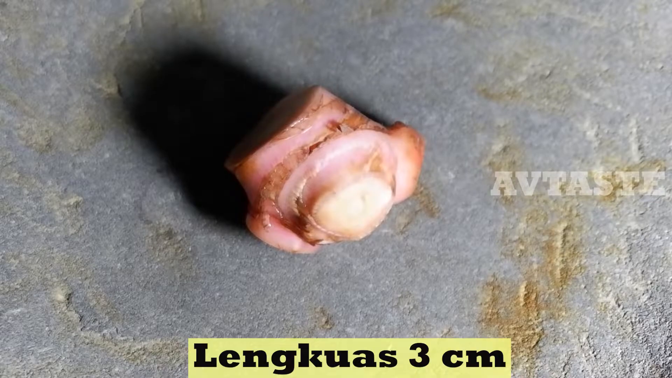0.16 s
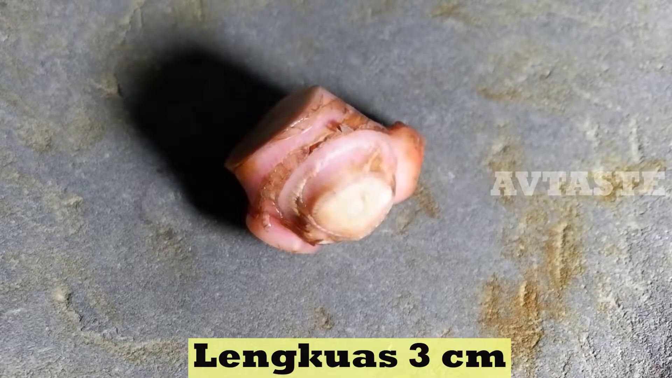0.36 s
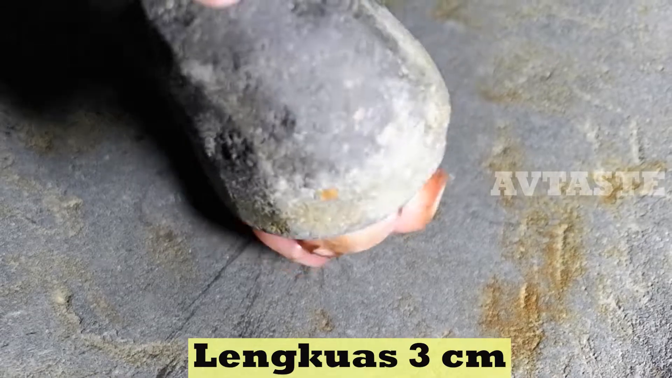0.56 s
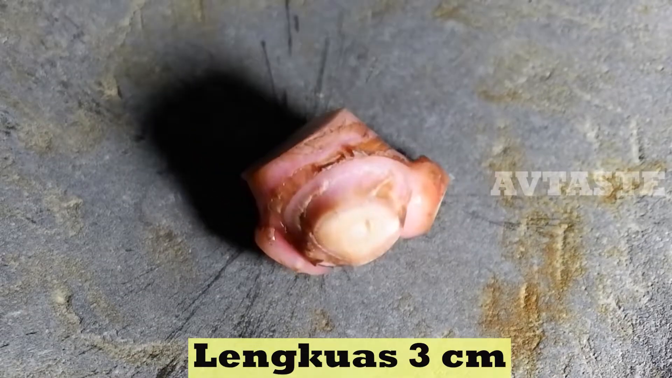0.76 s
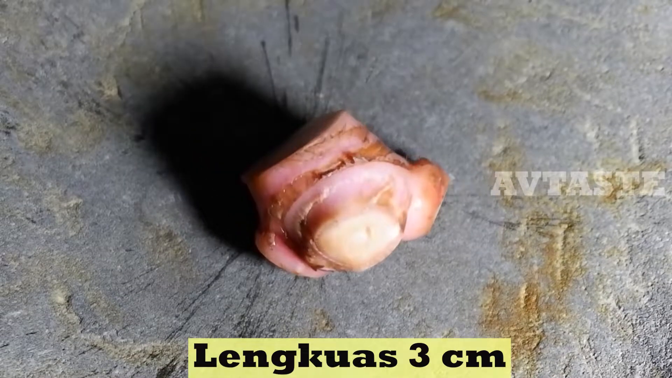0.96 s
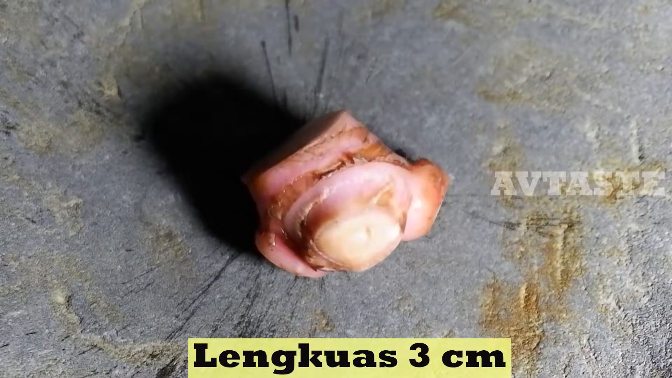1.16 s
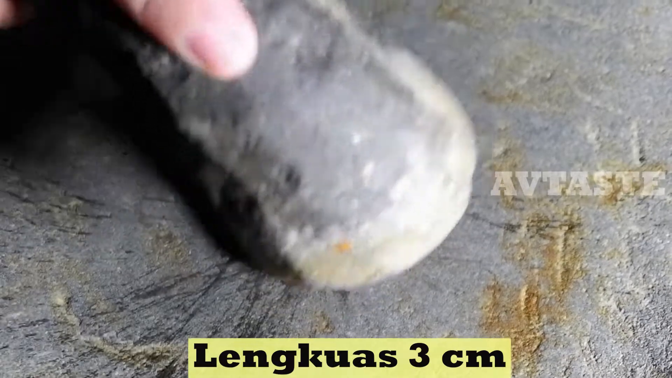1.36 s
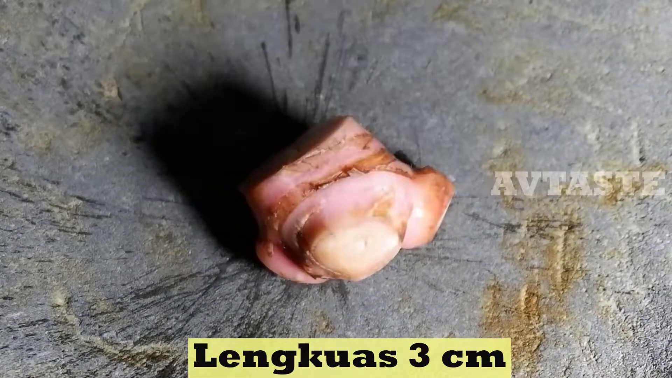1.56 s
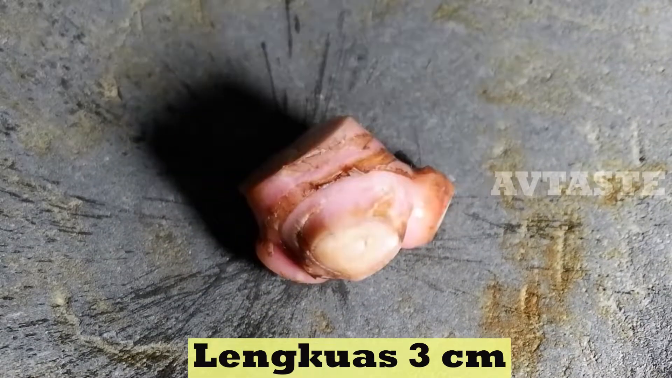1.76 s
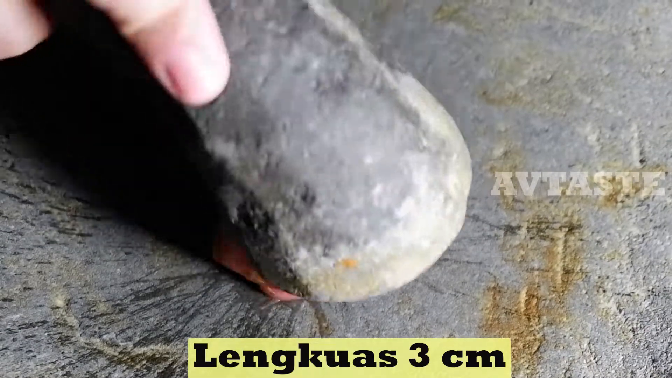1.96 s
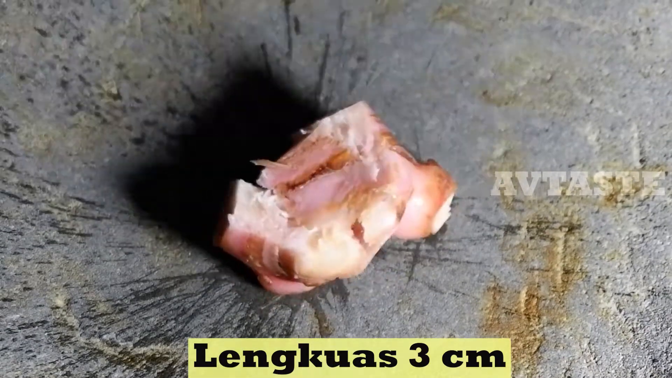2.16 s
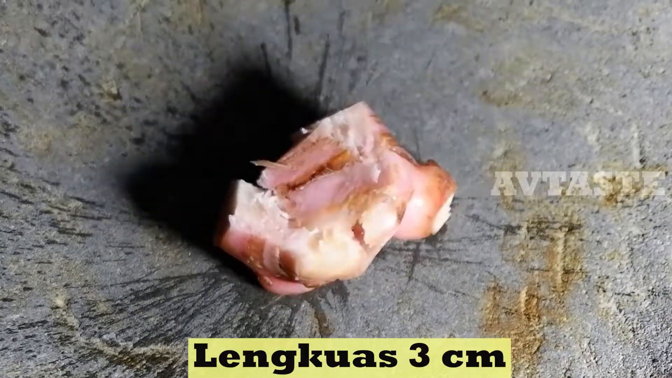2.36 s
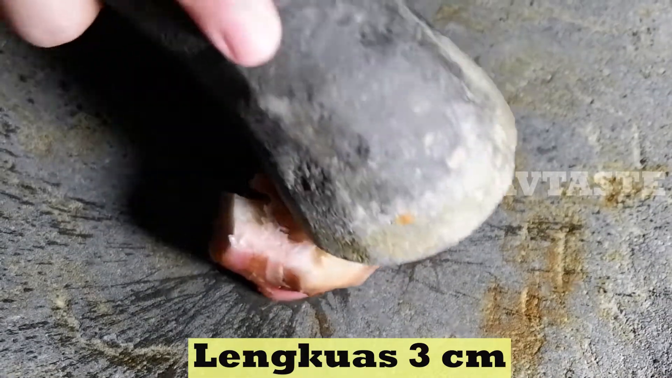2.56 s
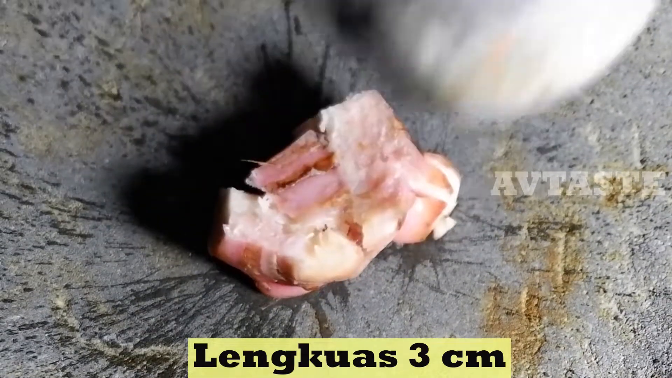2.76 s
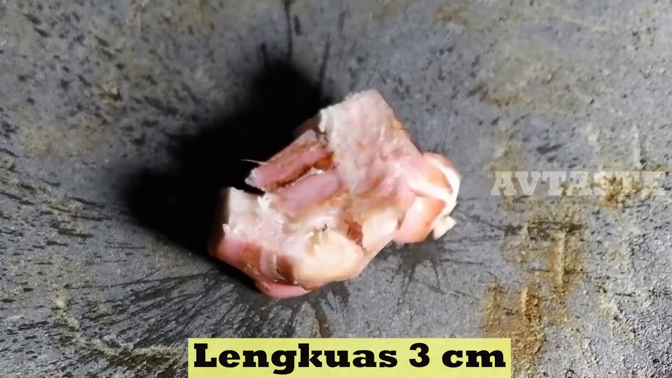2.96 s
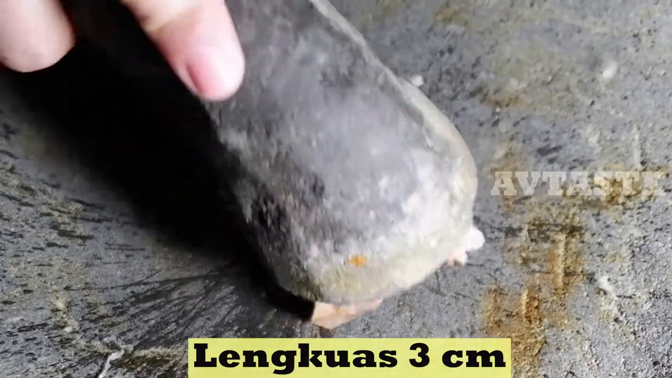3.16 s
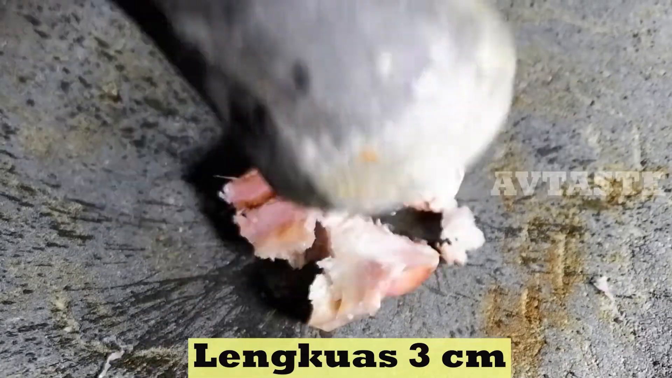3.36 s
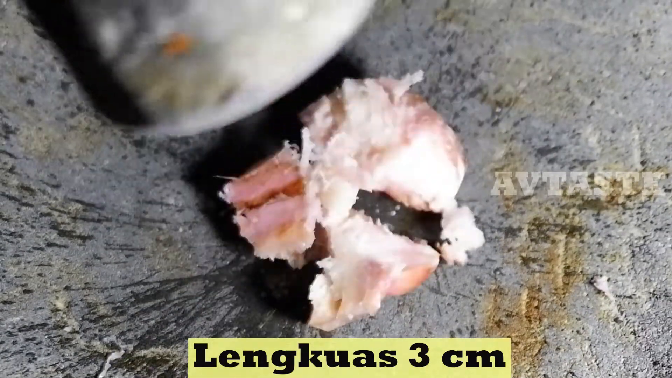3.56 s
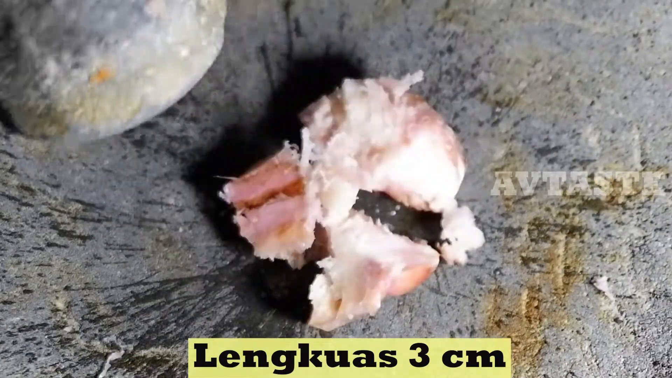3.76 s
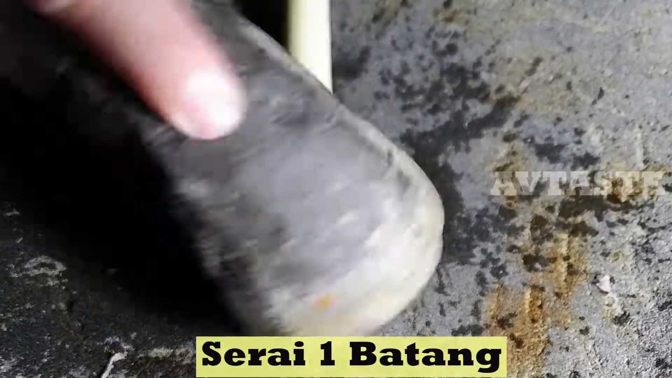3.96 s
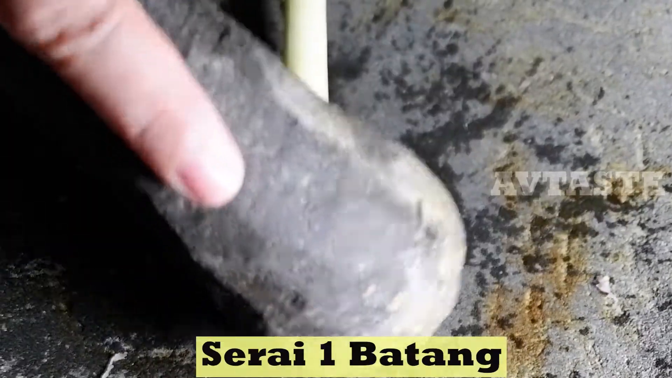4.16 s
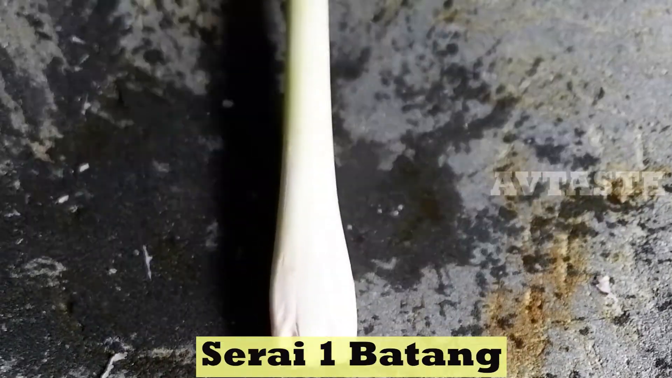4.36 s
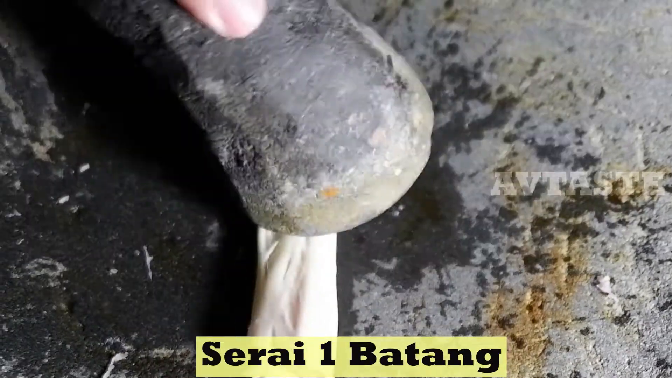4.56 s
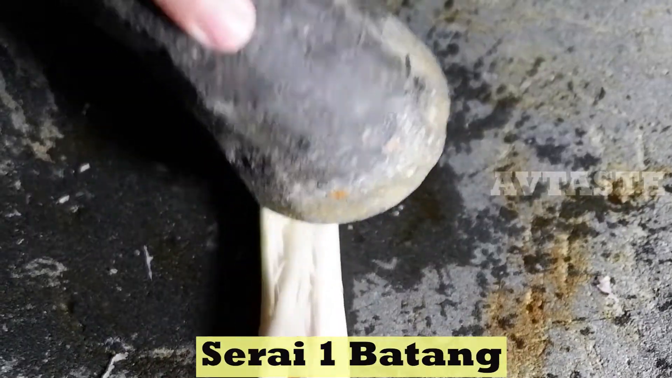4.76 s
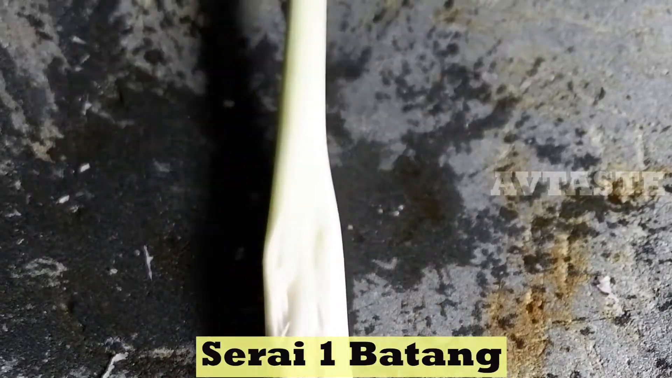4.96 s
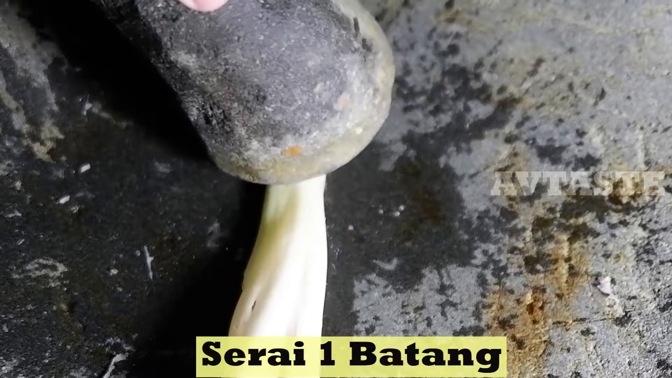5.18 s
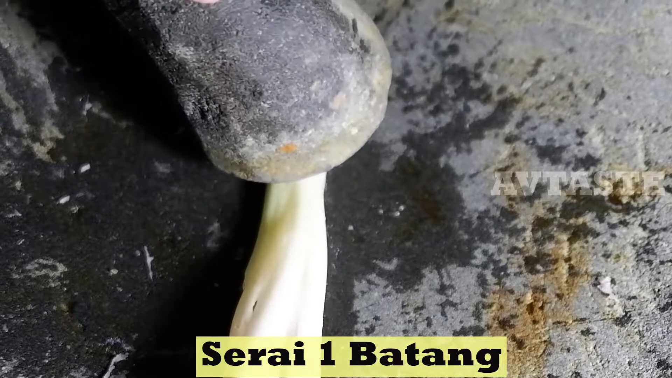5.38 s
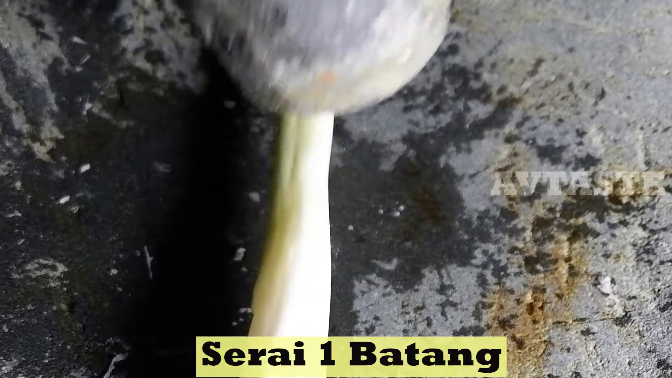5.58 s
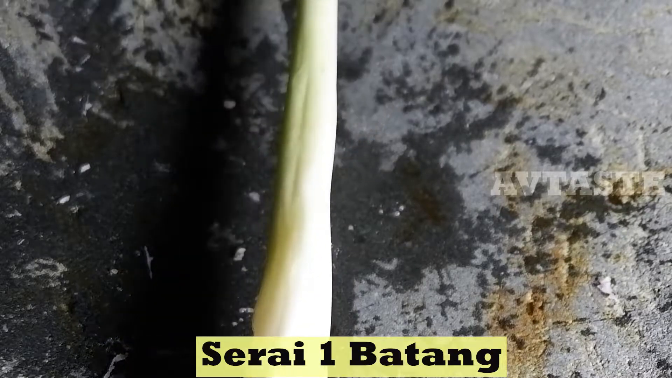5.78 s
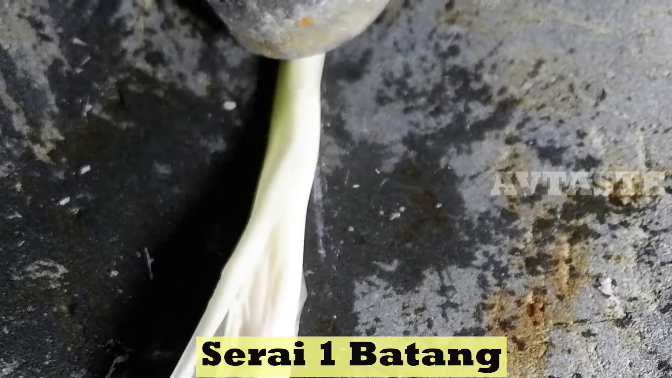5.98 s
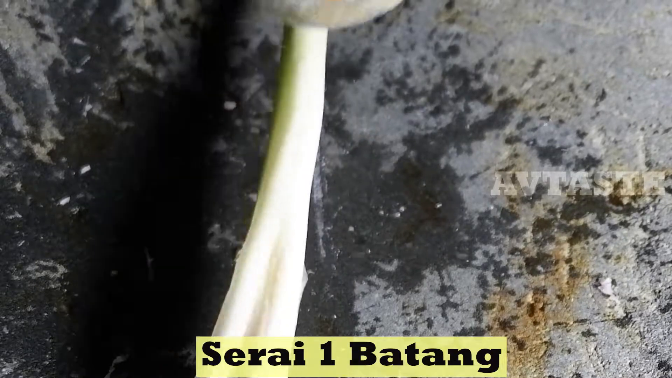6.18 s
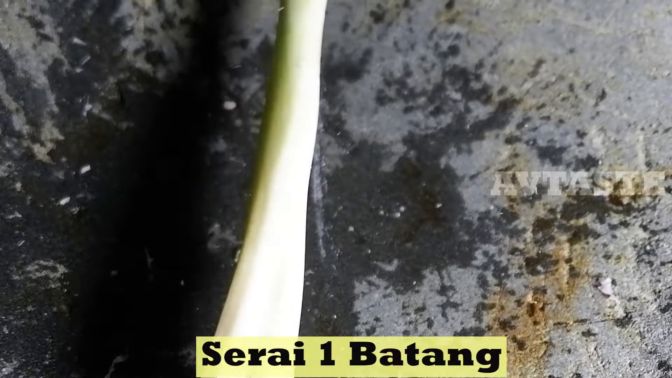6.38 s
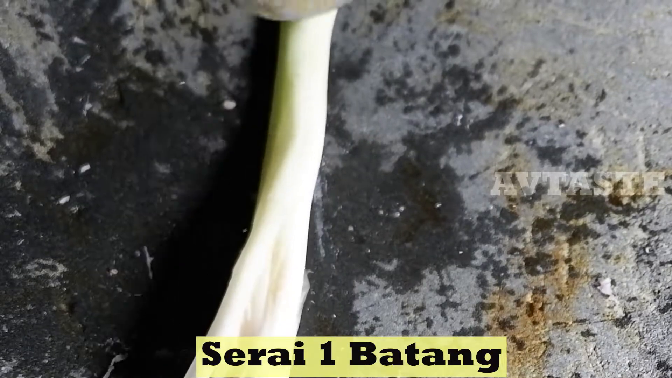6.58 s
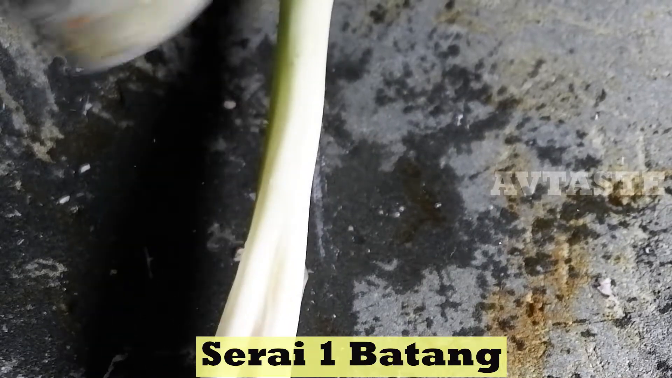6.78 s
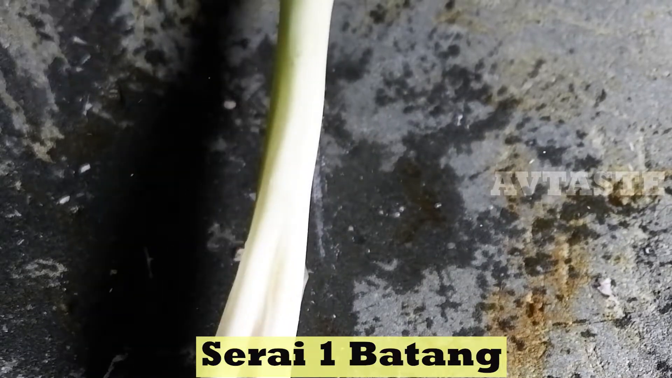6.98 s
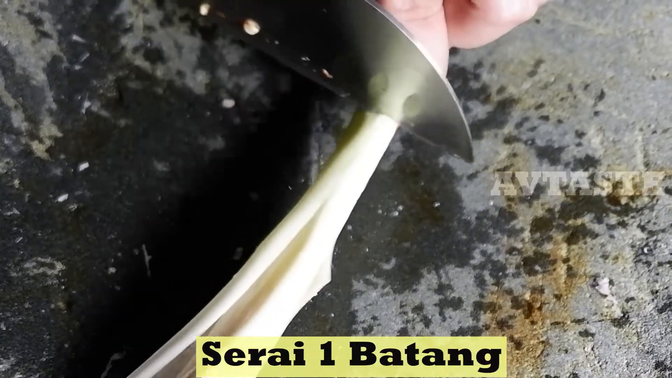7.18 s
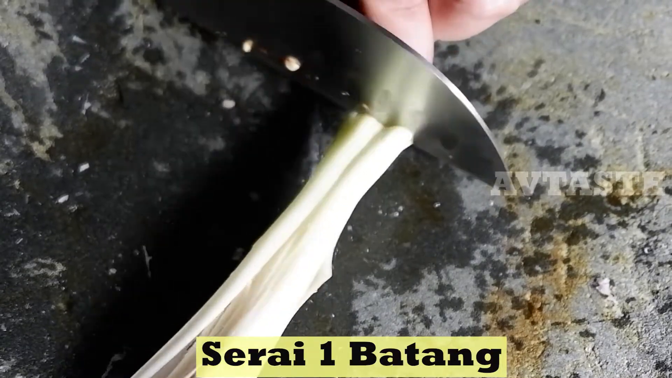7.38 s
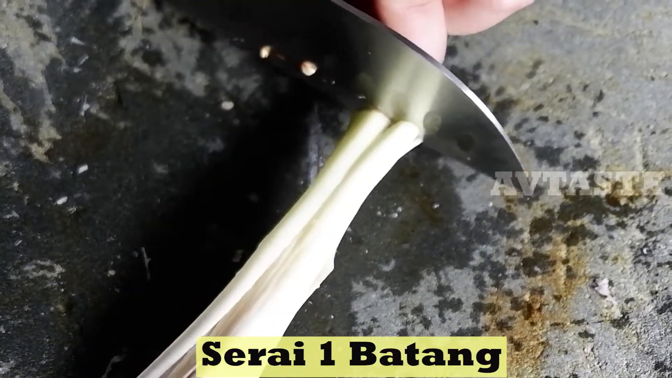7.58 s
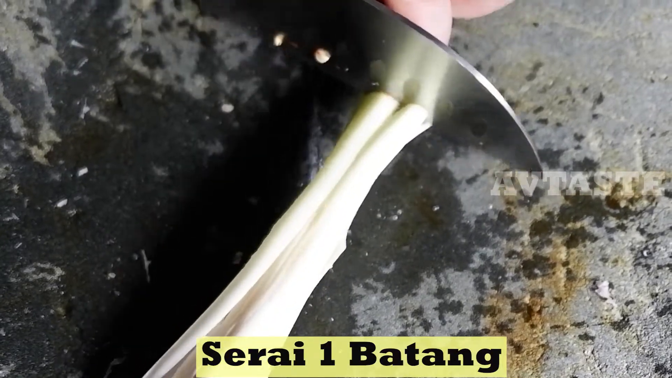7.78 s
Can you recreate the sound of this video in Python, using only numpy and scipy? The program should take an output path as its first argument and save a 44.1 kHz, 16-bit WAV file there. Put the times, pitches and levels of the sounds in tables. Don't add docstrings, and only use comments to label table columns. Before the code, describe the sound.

Ten spaced, crunching thuds of stone on slab ring through a hard kitchen, then cut abruptly to the dry, fibrous tearing of a blade.

```python
import sys
import numpy as np
from scipy import signal
from scipy.io import wavfile

SR = 44100
rng = np.random.default_rng(int(sys.argv[2]) if len(sys.argv) > 2 else 0)


def wav_record(signal):
    frames = np.transpose(np.atleast_2d(signal))
    bounded = np.clip(frames, -1, 1)
    quanta = np.round(bounded * 32767).astype(np.int16)
    wavfile.write(sys.argv[1], SR, quanta)


def ratio_of_db(decibels):
    return 10 ** (np.asarray(decibels, float) / 20)


N = 345303
HISS_BACK_S = 3.56

# (time [s], thud [dB], hardness [dB], mid echo [dB], high echo [dB])
BLOWS = [
    (0.5535, -21.5, 3, 10, -16),
    (1.3027, -20.5, 1, 9.5, -4.5),
    (1.935, -23.5, -1, 3, -5.5),
    (2.5643, -26, -0.5, -3.5, -2.5),
    (3.1804, -25.5, 3, -1, -4.5),
    (4.063, -23, 0, 5.5, -2),
    (4.6413, -22, -1, -3.5, -1.5),
    (5.2039, -26.5, -1, -3.5, -4),
    (6.0202, -25.5, 6.5, 2.5, -5),
    (6.5795, -23, 5, 2.5, -5.5),
]
# (time [s], level [dB], touch spacing [ms], second touch against first [dB])
ROCK_BACKS = [(.5835, -5, 11.5, 1.8), (1.3305, -6, 7, 2.5), (1.949, -11.5, 5.5, 7.5),
              (2.577, -10.5, 10.8, -1.5), (3.199, -10, 8, -3), (4.0785, -5.5, 6, -3.5),
              (4.657, -3, 6.4, -14), (5.231, -20, 9.1, -11), (6.04, -8, 7.4, -20), (6.5935, -4, 11, -1)]


def rms_one(x):
    return x / np.sqrt(np.mean(x ** 2) + 1e-20)


def in_time(rows, outside_db):
    s, db = np.transpose(rows)
    return np.interp(np.arange(N) / SR, s, db, left=outside_db, right=outside_db)


def at_hz(points, hz, axis=1):
    points = np.array(points)
    return np.interp(np.log(hz), np.log(points[:, 0]), points[:, axis])


def add(track, s, sound):
    at = round(s * SR)
    track[at:at + len(sound)] += sound[:N - at]


def ring(x, hz, t60_s):
    r = ratio_of_db(-60 / (t60_s * SR))
    w = 2 * np.pi * hz / SR
    return signal.lfilter([0, np.sin(w)], [1, -2 * r * np.cos(w), r * r], x + 1e-18)


def lowpass(x, order, hz):
    return signal.sosfilt(signal.butter(order, hz, fs=SR, output="sos"), x)


def passband(x, low_hz, high_hz):
    sos = signal.butter(2, [low_hz, min(high_hz, SR / 2.2)], "band", fs=SR, output="sos")
    return signal.sosfilt(sos, x)


def noise_bands(size):
    white = rng.standard_normal((2, 2, size))
    edges_hz = 30 * 2 ** np.arange(0, 9.6, .5)
    for k, (low_hz, high_hz) in enumerate(zip(edges_hz, edges_hz[1:])):
        yield np.sqrt(low_hz * high_hz), passband(white[k % 2], low_hz, high_hz)


def pair(mid, side, alike, pan_db):
    alike = np.clip(alike, 0, 1)
    both = np.sqrt(1 + alike) * mid + np.sqrt(1 - alike) * side * [[1], [-1]]
    return both * ratio_of_db([[pan_db / 2], [-pan_db / 2]])


def ducking():
    duck_rows = [7, 10, 7, 7, 7.7, 4.3, 2, 4.4, 6.5, .6]
    hold_s, back_db_per_s = 0.12, 18
    t, down_db = np.arange(N) / SR, np.zeros(N)
    for (s, *_), db in zip(BLOWS, duck_rows):
        on = (t > s) & ((t < HISS_BACK_S) | (s > HISS_BACK_S))
        climb_db = back_db_per_s * np.maximum(t - s - hold_s, 0)
        down_db = np.maximum(down_db, on * (db - climb_db))
    return -down_db


def hiss():
    # (frequency [Hz], density [dB per Hz])
    hiss_spectrum = [(35, -36), (50, -10), (140, -4), (190, -0.5), (300, -5.5), (2000, -18.5),
                     (4400, -15.5), (16000, -28.5)]
    # (frequency [Hz], likeness [0-1])
    hiss_alike = [(60, 0.84), (240, 0.53), (950, 0.38), (3770, 0.05), (15000, 0.08)]
    level_db = -48
    out = np.zeros((2, N))
    for hz, two in noise_bands(N):
        pan_db = np.interp(hz, [100, 3000], [-2.5, 0])
        out += ratio_of_db(at_hz(hiss_spectrum, hz)) * pair(*two, at_hz(hiss_alike, hz), pan_db)
    return rms_one(out) * ratio_of_db(level_db + ducking())


def kitchen(x):
    # (frequency [Hz], density [dB per Hz], t60 [s], left-right likeness [0-1], left minus right [dB])
    echo_bands = [(101, -34, 0.89, 0.69, -6), (306, -22, 1.344, 1, -3.5), (600, -35.5, 0.73, 0.95, -3),
                  (1200, -36.5, 0.89, 0.96, -3), (2400, -35, 0.86, 0.88, -4), (4140, -38, 0.78, 0.76, -1),
                  (8000, -46, 0.43, 0.34, 3), (14800, -40.5, 0.53, 0.22, -5)]
    t = np.arange(round(1.2 * SR)) / SR
    echo = np.zeros((2, len(t)))
    for hz, two in noise_bands(len(t)):
        db, t60_s, alike, pan_db = [at_hz(echo_bands, hz, axis=k) for k in (1, 2, 3, 4)]
        echo += ratio_of_db(db - 60 * t / t60_s) * pair(*two, alike, pan_db)
    echo = echo * np.clip((t - .003) / 0.0017, 0, 1)
    return signal.fftconvolve(x[None], echo, axes=1)[:, :N]


def contacts(rows, t60_s, rattle_db, settle_s):
    out, click, t = np.zeros(N), np.zeros(3000), np.arange(3000) / SR
    click[:12] = 1 / 12
    for (s, db, hz), white in zip(rows, rng.standard_normal((len(rows), 3000))):
        mode = ring(ring(click, hz * 1.034, t60_s), hz * 0.99, t60_s)
        rattle = rms_one(passband(white, hz * 0.48, hz * 1.39)) * np.exp(-t / settle_s)
        add(out, s, ratio_of_db(db - 5.0) * (mode / abs(mode).max() + ratio_of_db(rattle_db) * rattle))
    return out


def dull_bumps():
    # (time [s], level [dB], frequency [Hz])
    bump_rows = [
        (3.317, -24, 770),
        (3.562, -19.5, 425),
        (3.564, -24.5, 740),
        (3.6, -27, 720),
        (3.65, -35, 380),
        (3.692, -33, 775),
        (3.72, -36.5, 760),
        (3.77, -37.5, 640),
    ]
    return contacts(bump_rows, 0.016, rattle_db=-7.0, settle_s=0.018)


def swish():
    start_s, end_s, level_db, rise_db_per_s, fall_db_per_s = 5.1, 5.186, -43, 300, 90
    t = np.arange(N) / SR - start_s
    slope_db = np.minimum(rise_db_per_s * t, -fall_db_per_s * t)
    level = ratio_of_db(level_db + slope_db) * (t < end_s - start_s)
    rub = ring(ring(rng.standard_normal(N), 4300, 0.0021), 4300, 0.0021)
    return ratio_of_db(1.0) * level * rms_one(rub)


def tearing():
    # (frequency [Hz], width [Hz], level [dB])
    blade_modes = [(1520, 470, -2.5), (3020, 1900, -4), (4920, 750, -1.5), (5600, 230, -4)]
    sizes = ratio_of_db(3.9 * np.minimum(rng.exponential(1, N), 5))
    grains = sizes * rng.choice([-1, 1], N) * (rng.random(N) < 2500 / SR)
    out = np.zeros(N)
    for k, (hz, width_hz, db) in enumerate(blade_modes):
        out += (-1) ** k * ratio_of_db(db) * rms_one(ring(grains, hz, 2.9 / width_hz))
    return rms_one(out) + ratio_of_db(-2.5) * rms_one(passband(grains, 1600, 19000))


def knife():
    # (time [s], peak [dB])
    thick_snaps = [(7.1571, -34), (7.16, -32), (7.1886, -25), (7.2024, -32), (7.213, -31), (7.2518, -24.5),
                   (7.3041, -34), (7.324, -19.5), (7.334, -23), (7.35, -25), (7.3863, -25), (7.401, -33),
                   (7.411, -28), (7.4225, -24), (7.437, -23), (7.4904, -29), (7.5084, -22.5), (7.5237, -31),
                   (7.5434, -33), (7.7826, -32), (7.801, -38)]
    # (time [s], level [dB])
    press_rows = [(7.155, -46.5), (7.262, -39.5), (7.288, -49), (7.334, -46.5), (7.465, -31.5),
                  (7.49, -40.5), (7.772, -74), (7.786, -39), (7.83, -48)]
    thin_per_s, thin_over_tearing_db = 140, 6.5
    low_hz, high_hz = 3200, 6200
    press_db = in_time(press_rows, -120)
    out, t = ratio_of_db(press_db - 6.5) * tearing(), np.arange(400) / SR
    thin = np.flatnonzero((rng.random(N) < thin_per_s / SR) & (press_db > -60))
    snaps = list(thick_snaps) + [(at / SR, press_db[at] + thin_over_tearing_db) for at in thin]
    for (s, db), draw in zip(snaps, rng.standard_normal((60, 401))):
        burst = draw[1:] * np.exp(-t / .001)
        hz = low_hz + (high_hz - low_hz) * (1 + np.tanh(draw[0])) / 2
        snap = passband(burst, hz / 3.3, hz * 1.4) * 3.8 + passband(burst, 1900, 13000)
        add(out, s, ratio_of_db(db - 1.2) * snap / abs(snap).max())
    return out


def pestle():
    # (time [s], level [dB], frequency [Hz])
    stone_rings = [(5.198, -24, 2950), (2.56, -31, 5150), (2.56, -24, 850), (1.30, -35, 5700),
                   (4.058, -34, 5200), (4.645, -28, 830), (6.022, -27, 860)]
    ring_t60_s, hum_t60_s, hum_db = 0.075, 0.6, -17
    out, hum, click = np.zeros(N), np.zeros(N), np.zeros(20000)
    click[0] = 1
    for s, db, hz in stone_rings:
        add(out, s, ratio_of_db(db) * ring(click, hz, ring_t60_s))
        add(hum, s, ratio_of_db(db + hum_db) * ring(click, hz, hum_t60_s))
    return out, hum


def rocking():
    centre_hz, spread, last_touch_db = 930, .04, -9
    pitch_hz = centre_hz * (1 + spread * rng.standard_normal((len(ROCK_BACKS), 3)))
    rows = []
    for (s, db, ms, second_db), hz in zip(ROCK_BACKS, pitch_hz):
        for k, step_db in enumerate((0, second_db, second_db + last_touch_db)):
            rows.append((s + k * ms / 1000, db + step_db, hz[k]))
    return rows


def slab_knocks():
    # (time [s], level [dB], frequency [Hz])
    knock_rows = [(.5482, 1.5, 835), (1.2972, -0.5, 923), (1.9290, 0.5, 1387), (2.5580, -2, 1465),
                  (3.1730, -7.5, 1200), (4.0635, -3.5, 985), (4.6425, -3, 880), (5.2045, -7.5, 950),
                  (6.0140, -4, 960), (6.0215, -3.5, 900), (6.576, -7.5, 880), (6.583, -9, 1040)]
    return contacts(list(knock_rows) + rocking(), 0.0068, rattle_db=-8.5, settle_s=0.0099)


def cracks():
    # (time [s], level [dB], centre [Hz], duration [ms], brightness [dB])
    crack_rows = [(.5470, -11.5, 850, 4.8, -2.5), (.5535, -14, 3000, 1.8, -28),
                  (1.2968, -1.5, 2300, 3.4, -5), (1.9289, -2.5, 2070, 3.05, -5.5),
                  (2.5578, -7.5, 1830, 6.1, 3.5), (3.1720, -3.5, 3050, 6.4, -16.5),
                  (4.0547, -3, 2400, 5.3, -5), (4.6299, -7.5, 1690, 3.3, -16), (4.6343, -17, 3820, 7.9, 6),
                  (5.1878, -11, 1750, 1.5, -2), (5.1938, -11, 2400, 5.3, 4.5), (5.1972, -7, 2860, 1.3, -18),
                  (6.0068, -12, 2100, 6.4, -24), (6.0137, -4.5, 4880, 4.4, -32),
                  (6.5712, -11.5, 4750, 1.8, -2), (6.5685, -23, 3320, 22, 2)]
    # (time [s], level [dB])
    squeeze_rows = [(.5834, -31), (0.602, -36), (1.287, -29), (1.333, -17.5), (1.921, -45), (2.55, -25.5),
                    (3.164, -28)]
    squeeze_hz, squeeze_ms, squeeze_bright_db = 2100, 7, -14
    rows = list(crack_rows) + [(s, db, squeeze_hz, squeeze_ms, squeeze_bright_db) for s, db in squeeze_rows]
    out, t = np.zeros(N), np.arange(1500) / SR
    rise = np.clip(t / .0007, 0, 1)
    for (s, db, hz, ms, bright_db), white in zip(rows, rng.standard_normal((len(rows), 1500))):
        splinters = white * rise * np.exp(-(t / (ms * 0.00067)) ** 2.53)
        tone = passband(splinters, hz / 1.86, hz * 1.39)
        spit = passband(splinters, 1530, 5700)
        body = passband(white * rise * np.exp(-t / 0.0023), 440, 1590)
        sound = tone / abs(tone).max() + ratio_of_db(bright_db) * spit / abs(spit).max()
        sound = sound + ratio_of_db(-6.5) * body / abs(body).max()
        add(out, s, ratio_of_db(db + 4.5) * sound)
    return out


def blow_echo():
    low_db, low_growth = 14, 1.4
    low, middle, high = np.zeros((3, N))
    push = np.hanning(round(0.002 * SR))
    for (s, db, hard_db, middle_db, high_db), (rock_s, *_) in zip(BLOWS, ROCK_BACKS):
        add(low, s + 0.0018, ratio_of_db(low_db + low_growth * (db + hard_db)) * push)
        add(middle, s - .006, ratio_of_db([middle_db + 7]))
        add(middle, rock_s, ratio_of_db([middle_db + 10]))
        add(high, s - .007, ratio_of_db([high_db + 15]))
    far = passband(low, 142, 476) + passband(middle, 550, 1420) + passband(high, 1450, 9900)
    return far + ratio_of_db(-12) * passband(high, 3980, 6120)


def jolt():
    length_ms, lead_s, level_db = 4.4, .0015, 15
    out = np.zeros(N)
    cycle = np.sin(np.linspace(0, 2 * np.pi, round(length_ms * SR / 1000)))
    for s, db, hard_db, *_ in BLOWS:
        add(out, s - lead_s, ratio_of_db(db + hard_db + level_db) * cycle)
    return passband(out, 110, 1500)


def thuds():
    # (frequency [Hz], level [dB], t60 [s])
    room_rows = [(53.3, 3.5, 0.55), (67, -7.5, 1.0), (89, -4, 0.57), (102.3, -15.5, 1.9),
                 (129.9, -1.5, 1.44), (156.4, 1.5, 1.14), (170.5, 1, 1.4), (183.8, -1, 1.4),
                 (189.8, 7, 0.54), (194.7, -3, 2.14), (211.6, 2.5, 1.24), (223, 7, 0.43)]
    # (frequency [Hz], level [dB], t60 [s])
    counter_rows = [(235, -2.5, 1.27), (265, -37, 0.43), (266.8, -2.5, 1.19), (282, 6.5, 0.18),
                    (331.7, 11, 0.077), (361.4, 4, 0.15), (381, 6, 0.22), (446, -36, 0.36), (527, -3, 0.28)]
    swell_t60_s = .018
    soft, hard, boom = np.zeros((3, N))
    push = np.hanning(round(0.002 * SR))
    push = push / push.sum()
    for s, db, hard_db, *_ in BLOWS:
        add(soft, s + 0.00041, ratio_of_db(db) * push)
        add(hard, s + 0.0003, ratio_of_db(db + hard_db) * push)
    for x, modes in ((soft, room_rows), (hard, counter_rows)):
        for hz, db, t60_s in modes:
            swell = ring(x, hz, 1 / (1 / t60_s + 1 / swell_t60_s))
            boom -= ratio_of_db(db) * (ring(x, hz, t60_s) - swell)
    return boom


def microphones(x):
    low = lowpass(x, 2, 3500)
    treble = x - low
    late = 0.51 * treble + 0.72 * np.roll(treble, 1)
    return low * ratio_of_db([[-1.7], [1.5]]) + np.array([treble, late]) * ratio_of_db([[.6], [-.6]])


def housing(x):
    x = signal.sosfilt(signal.butter(4, 85, "high", fs=SR, output="sos"), x)
    return lowpass(x, 4, 10500)


def dip(x):
    dip_hz, width_hz, share = 3613, 440, 0.55
    return x - share * signal.lfilter(*signal.iirpeak(dip_hz, dip_hz / width_hz, SR), x)


def scene():
    cut_s = 7.05
    knock, bump, crack = slab_knocks(), dull_bumps(), cracks()
    stone, hum = pestle()
    near = thuds() + crack + knock + bump + stone + hum + swish()
    sent = blow_echo() + ratio_of_db(-8.0) * passband(knock, 493, 1060) + ratio_of_db(-6.0) * bump + ratio_of_db(0.5) * stone
    blows = microphones(near) + kitchen(sent)
    before_cut = np.clip((cut_s - np.arange(N) / SR) / 0.005, 0, 1)
    blade = knife()
    cutting = microphones(blade) + ratio_of_db(-6) * kitchen(blade)
    return dip(housing(blows * before_cut + cutting) + microphones(jolt()) + hiss())


def band_limit(x):
    return signal.sosfilt(signal.butter(12, 16400, fs=SR, output="sos"), x)


def record(dry):
    flat = dry / (1 + abs(dry) ** 6) ** (1 / 6)
    offset = -.0008
    return band_limit(flat + offset)


dry = scene()
out = record(dry)
wav_record(out)
```